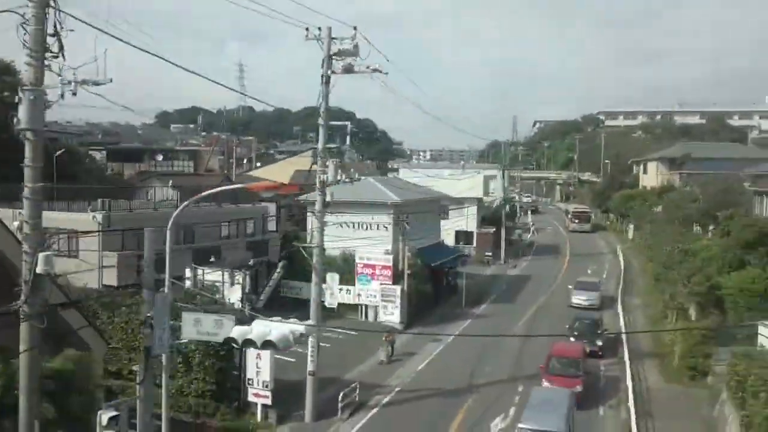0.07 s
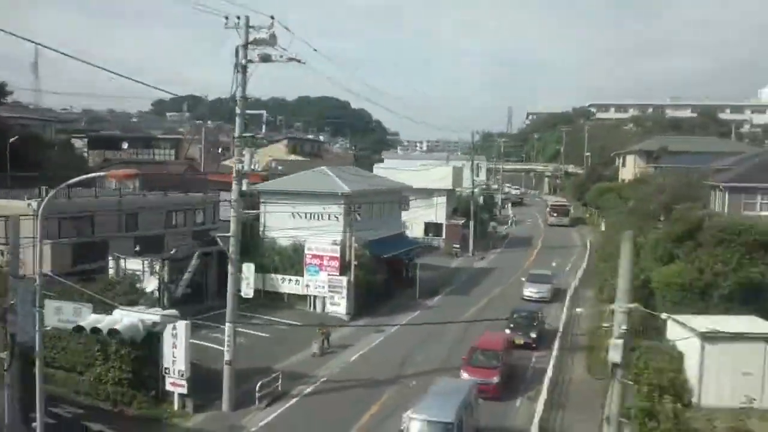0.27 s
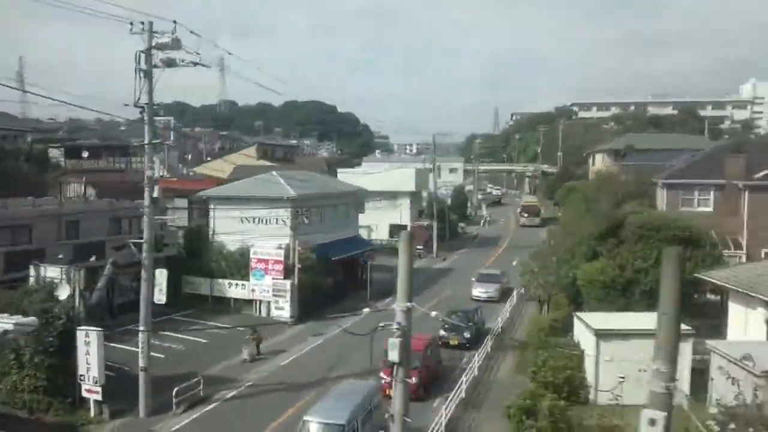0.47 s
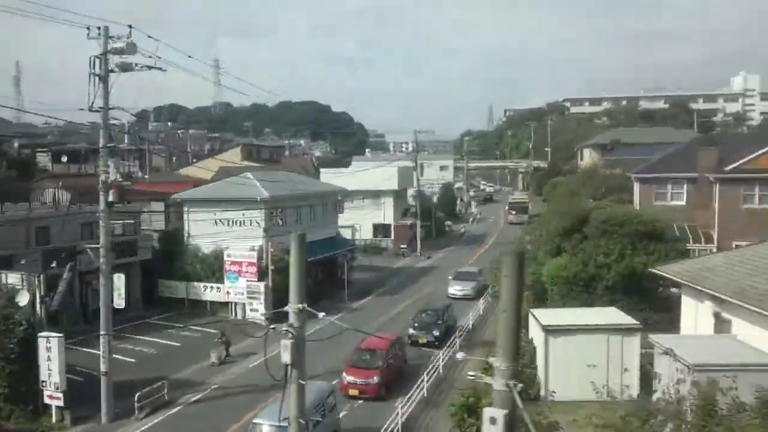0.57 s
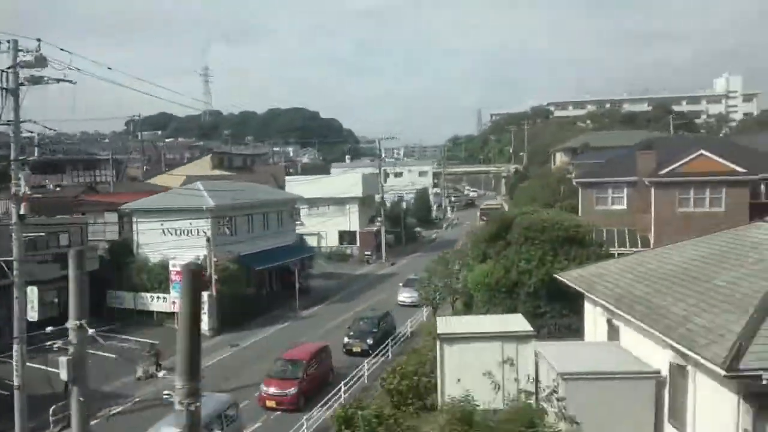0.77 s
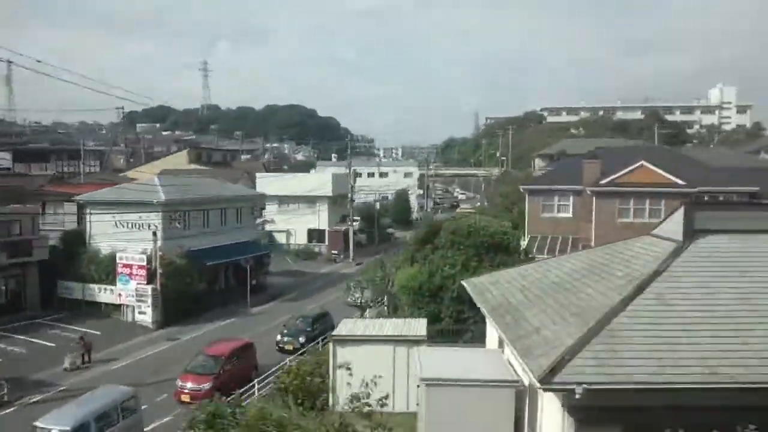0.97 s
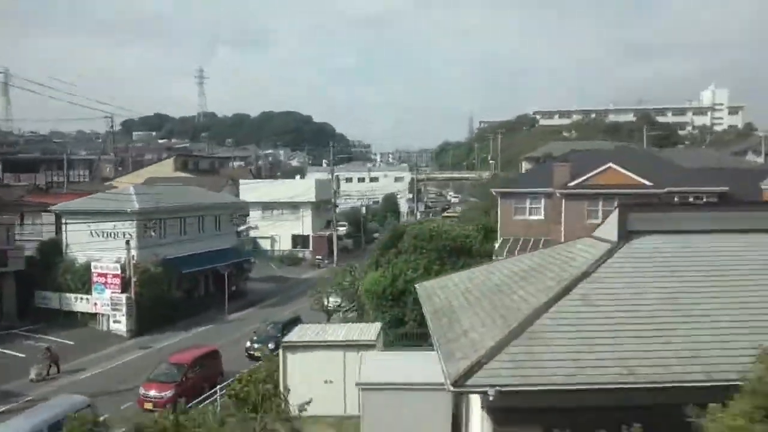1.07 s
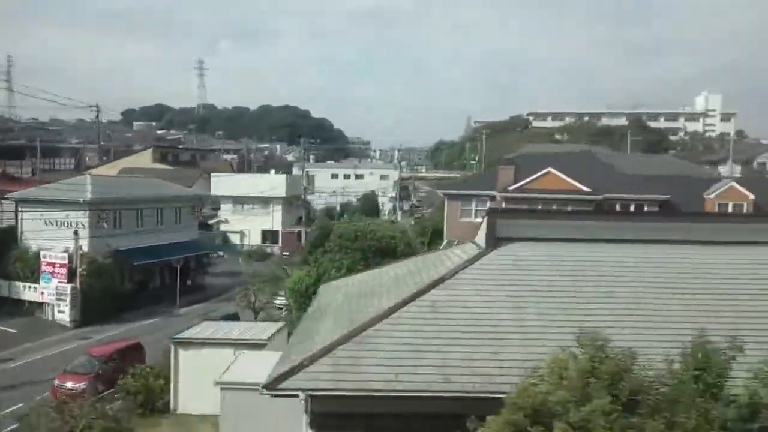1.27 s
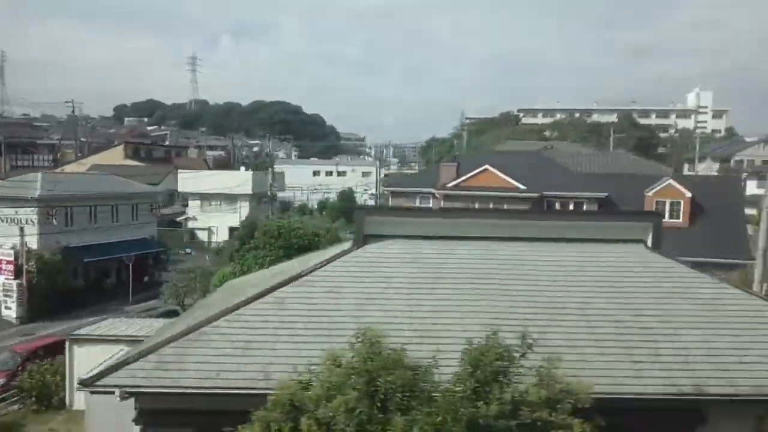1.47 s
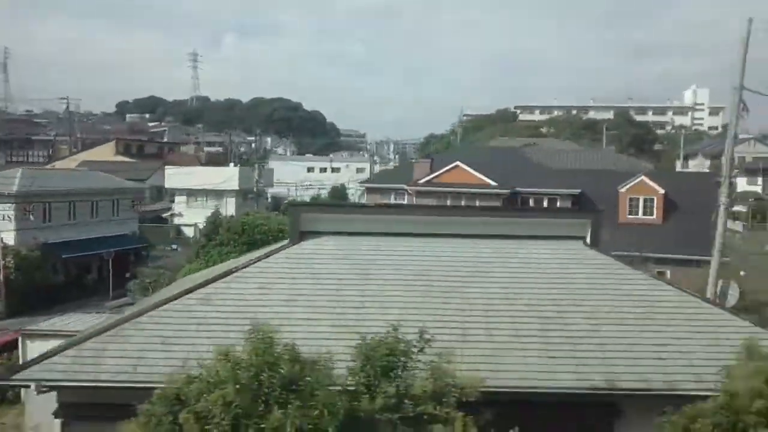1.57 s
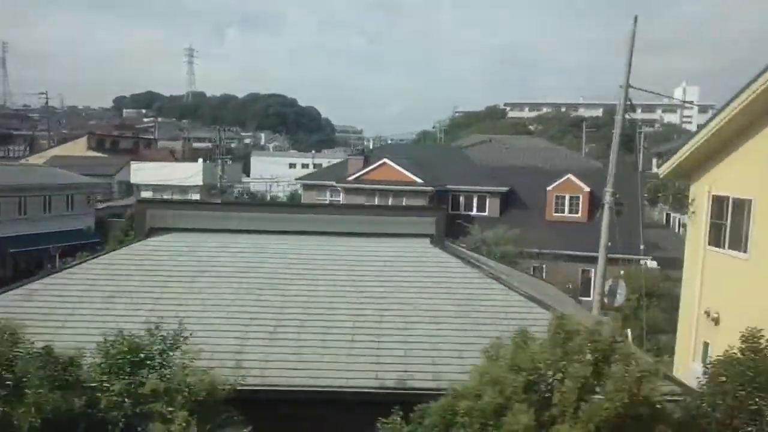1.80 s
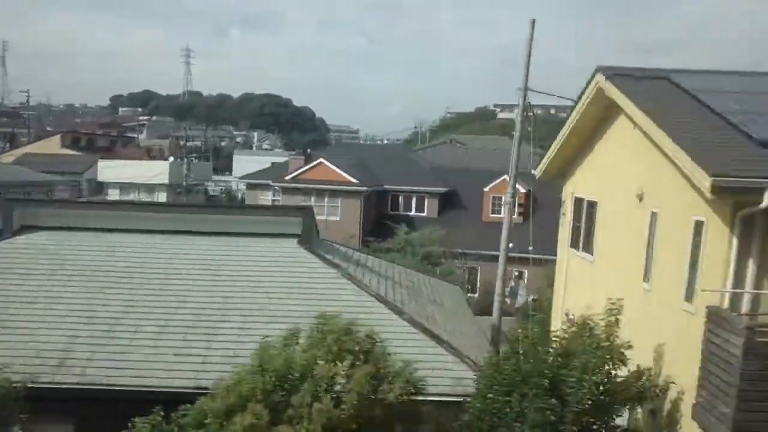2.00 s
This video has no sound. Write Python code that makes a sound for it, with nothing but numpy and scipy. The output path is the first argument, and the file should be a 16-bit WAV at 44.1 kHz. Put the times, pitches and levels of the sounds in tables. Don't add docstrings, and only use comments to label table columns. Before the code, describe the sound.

A loose fitting knocks irregularly right beside the microphone over the low rumble of a train cabin

```python
import sys
import numpy as np
from scipy import signal
from scipy.fft import rfft, irfft, next_fast_len
from scipy.io import wavfile
from scipy.ndimage import uniform_filter1d, map_coordinates

SR = 44100
rng = np.random.default_rng(int(sys.argv[2]) if len(sys.argv) > 2 else 0)


def digitize_waveform(pressure):
    field = np.atleast_2d(pressure).T
    bounded = np.clip(field, -1, 1)
    quanta = np.round(bounded * 32767).astype(np.int16)
    wavfile.write(sys.argv[1], SR, quanta)


def nominal_scale(level):
    x = np.asarray(level, float) / 20
    return 10 ** x


N = 89919

# start_s, thud_peak_db, crack_over_thud_db, thud_pitch_hz
KNOCKS = [(0.043, -8, -11.5, 580), (0.164, -14.5, -14, 608), (0.216, -19, -28, 510),
          (0.2945, -19.5, -25, 594), (0.53, -19, -29.5, 670), (.558, -21, -32, 700),
          (0.7997, -8.5, -19.5, 585), (0.8031, -18.5, 0, 509), (0.8057, -11.5, -14.5, 436),
          (0.955, -6, -16.5, 555), (.9615, -15.5, -10, 450), (1.166, -17.5, -19, 563),
          (1.191, -7.5, -26, 564), (1.223, -12, -23, 510), (1.2972, -4.5, -10.5, 544),
          (1.401, -12.5, -31, 525), (1.431, -21, -27, 606), (1.546, -31, -36, 560),
          (1.586, -15.5, -19, 480), (1.593, -7.5, -11.5, 546), (1.5975, -13, -19, 540),
          (1.9099, -7.5, -11.5, 574), (1.917, -14, -14, 470), (2.009, -13, -16, 630)]
# ratio_to_pitch, level_db, t60_s
CASE_MODES = [(1.014, 0.5, 0.016), (1, -20, 0.075), (1.6, -18, 0.0083), (0.83, -9, 0.012)]
# pitch_hz, level_db, t60_s
CRACK_MODES = [(2440, -15, 0.0058), (3720, -4.5, 0.004), (4260, -8.5, 0.013), (1450, -12, 0.0044),
               (3070, -8, 0.0017)]
# freq_hz, density_db_per_hz
CONTACT_COLOUR = [(900, -25.5), (1900, 8), (4500, -9), (5800, -11.5), (8000, -22.5), (16000, -70.5)]
# start_s, level_db
TICKS = [
    (.2175, -21),
    (1.298, -32.5),
]
# freq_hz, density_db_per_hz
TICK_COLOUR = [(2000, -52), (3300, -13.5), (4700, 11), (6500, -5.5), (8500, -11.5), (10500, -30.5),
               (16000, -32.5), (18000, -70)]
# pitch_hz, width_hz, level_db
PANEL_NOTES = [(106.6, 25.6, -4), (175, 15.2, -0.5), (232.8, 26, -4), (346, 28.5, -9.5), (420.2, 16.6, -11)]
# time_s, level_db
SHAKE = [(0, -21.5), (.1, -28), (.2, -26.5), (.3, -22), (.42, -25), (.55, -35), (.72, -32.5), (.9, -30),
         (1, -21.5), (1.12, -22.5), (1.22, -25.5), (1.38, -20.5), (1.5, -23.5), (1.63, -17), (1.72, -28),
         (1.85, -33.5), (2.04, -21.5)]
# start_s, peak_db, pitch_hz, t60_s
THUMPS = [(0.031, -11.5, 129.2, 0.27), (.169, -16.5, 230, 0.19), (0.213, -6.5, 228.5, 0.27),
          (0.236, -23.5, 223, 0.14), (0.333, -3.5, 211.2, 0.28), (.44, -11, 228, 0.18),
          (1.021, -1, 218, 0.049), (1.151, -11.5, 148, 0.11), (1.62, -15.5, 334.4, 0.29),
          (0.5442, -1.5, 332.5, 0.059), (.585, -4, 315, 0.031), (0, -10, 32, .2), (.213, -9, 151, .08),
          (1.105, -6, 136, 0.11), (1.089, -14, 280, 0.077), (1.914, -9, 65, .15), (0.965, -10.5, 255.6, .2),
          (1.04, -15, 277, 0.063), (0.359, -14, 304, 0.13), (1.307, -10, 256.4, 0.22),
          (0.8, -5, 189, 0.053), (0.858, 2, 169, 0.042), (0.961, -2, 175, 0.12), (1.111, -4, 226.4, 0.12),
          (1.256, -8.5, 196, .1), (1.298, -1, 177.5, 0.21), (1.406, -8.5, 209, 0.23),
          (1.458, -4.5, 216.7, 0.21), (1.584, -7, 167.2, 0.48), (1.913, -0.5, 206.2, 0.13),
          (1.96, -6.5, 217, 0.097), (2.014, -30, 184, 0.074)]
# time_s, level_db
SWAY = [(0, -16.5), (.12, -26), (.2, -24.5), (.3, -17), (.4, -21.5), (.5, -14.5), (.6, -17.5), (.72, -21),
        (.9, -21.5), (1.03, -15), (1.16, -15), (1.26, -15), (1.31, -23.5), (1.45, -19.5), (1.65, -20),
        (1.8, -19), (1.92, -24), (2.04, -18.5)]
# freq_hz, density_db_per_hz
RUMBLE_COLOUR = [(11, -40.5), (22, 7.5), (50, 0), (92, -2), (130, -10), (210, -53), (350, -120)]
# time_s, level_db
TYRE_LOAD = [(0, 1.5), (.1, -3), (.28, -0.5), (.42, 0.5), (.52, -1), (.58, 3.5), (.7, 1), (.83, 2.5),
             (.92, 3.5), (1, 7), (1.08, 1), (1.16, 4.5), (1.24, 8), (1.35, 7.5), (1.47, -1), (1.62, 4),
             (1.76, -5), (2.04, 4.5)]
# freq_hz, density_db_per_hz
ROAR_COLOUR = [(90, -24.5), (200, -3), (400, -8), (700, -10.5), (1100, -18), (1700, -27.5), (3000, -39.5),
               (9000, -120)]
# time_s, level_db
DRAUGHT = [(0, -41), (.1, -49), (.25, -44), (.38, -38.5), (.55, -46.5), (.7, -43.5), (.83, -39), (.95, -44),
           (1.05, -42), (1.15, -40), (1.3, -43), (1.5, -46), (1.7, -45), (1.82, -40.5), (1.87, -37.5),
           (2.04, -45.5)]
# freq_hz, density_db_per_hz
AIR_COLOUR = [(800, -10), (2200, -2), (3100, -7), (4700, 0.5), (5600, -7.5), (6500, -15), (8000, -20.5),
              (16000, -63.5)]
# start_s, level_db
RATTLES = [(0.2524, -31), (0.3413, -28.5), (0.3722, -27.5), (.39, -49), (0.5207, -37.5), (1.0231, -44),
           (1.041, -36), (1.051, -28), (1.359, -43), (1.3985, -44), (1.4284, -33), (1.4664, -32),
           (1.5424, -41), (1.5686, -31.5), (1.579, -29), (1.6412, -33), (1.706, -38), (1.7414, -49.5),
           (1.8528, -30), (1.971, -55)]
# freq_hz, density_db_per_hz
RATTLE_COLOUR = [(900, -48), (2000, -19.5), (3500, 1), (5000, -5), (6500, -12), (9000, -46.5), (16000, -80)]
# start_s, depth_db
DUCKS = [
    (0.049, 3.5),
    (0.221, 5.5),
    (0.345, 10.5),
    (0.528, 0.5),
    (0.959, 6.5),
    (1.188, 3.5),
    (1.3037, 12.5),
    (1.602, 5.5),
    (1.919, 11),
]
# freq_hz, level_db_per_bin
FAINTEST = [(1500, -90), (2900, -83), (4500, -93), (5600, -84.5), (7000, -83.5), (9000, -75), (16000, -91)]
# time_s, rise_db
STRAIN = [(0, 7), (.1, -0.5), (.235, 7), (.27, -6.5), (.36, 2.5), (.45, -6), (.55, -1), (.8, 4),
          (.93, -3.5), (1.02, 7), (1.1, -2), (1.22, 3), (1.34, -2), (1.47, 1), (1.56, -5.5), (1.63, 2),
          (1.9, 1), (1.95, 3)]
SHARP_BLOWS = [
    .219,
    1.299,
]

SOFT_START_S = 0.0006


def unit(x):
    return x / np.sqrt(np.mean(x ** 2) + 1e-20)


def along(points, hz):
    f, v = np.transpose(points)
    return np.interp(np.log(hz + 1), np.log(f + 1), v)


def curve(rows):
    s, v = np.transpose(rows)
    return np.interp(np.arange(N) / SR, s, v)


def wobble(rate):
    return map_coordinates(rng.standard_normal(400), [np.arange(N) * rate / SR])


def filtered(x, response):
    m = next_fast_len(N + SR // 2)
    return irfft(rfft(x, m) * response(np.fft.rfftfreq(m, 1 / SR)), m)[:N]


def patchy(spectrum, patchy_db):
    z = signal.stft(rng.standard_normal(N + 512), nperseg=512)[2]
    field = uniform_filter1d(rng.standard_normal(z.shape), size=8, axis=0)
    field = uniform_filter1d(field, size=10, axis=1)
    noise = signal.istft(z * nominal_scale(patchy_db * unit(field)), nperseg=512)[1][:N]
    return unit(filtered(noise, lambda hz: nominal_scale(along(spectrum, hz))))


def ring(hz, t60, rise_s, t):
    return -np.sin(2 * np.pi * hz * t) * nominal_scale(-60 * t / t60) * (1 - np.exp(-t / rise_s))


def puff(level_db, t60, t):
    return nominal_scale(level_db - 60 * t / t60) * (1 - np.exp(-t / SOFT_START_S))


def add(track, s, sound):
    part = track[round(s * SR):][:len(sound)]
    part += sound[:len(part)]


def knock(pitch, crack_db, t):
    crack_lag_s, detune, scatter_db = 0.0003, 0.04, 0.54
    modes = [(pitch * ratio, level, t60, 0) for ratio, level, t60 in CASE_MODES]
    modes += [(hz, level + crack_db, t60, crack_lag_s) for hz, level, t60 in CRACK_MODES]
    sound = np.zeros(len(t))
    for hz, level, t60, lag_s in modes:
        a, b = rng.standard_normal(2)
        note = ring(hz * (1 + detune * b), t60, SOFT_START_S, np.maximum(t - lag_s, 0))
        sound += nominal_scale(level + scatter_db * a) * note
    return sound


def fitting():
    thuds, clicks, snaps, ticks = np.zeros((4, N))
    t = np.arange(SR // 10) / SR
    for s, db, crack_db, pitch in KNOCKS:
        add(thuds, s, nominal_scale(db + 4) * knock(pitch, crack_db, t))
        clicks[round((s + 0.0012) * SR)] = -nominal_scale(db + crack_db + 12.5)
        add(snaps, s, puff(db + crack_db, 0.011, t))
    for s, db in TICKS:
        add(ticks, s, nominal_scale(db - 60 * t / 0.0072))
    near = thuds + filtered(clicks, lambda hz: nominal_scale(along(CONTACT_COLOUR, hz)))
    near += snaps * patchy(CONTACT_COLOUR, patchy_db=1)
    near += ticks * patchy(TICK_COLOUR, patchy_db=1)
    return near + cabin(near)


def cabin(near):
    level_db, t60_s, cutoff_hz = -11, 0.09, 900
    t = np.arange(SR // 4) / SR
    tail = rng.standard_normal(len(t)) * nominal_scale(-60 * t / t60_s)
    wet = signal.fftconvolve(near, tail / np.linalg.norm(tail))[:N]
    return nominal_scale(level_db) * filtered(wet, lambda f: 1 / (1 + 1j * f / cutoff_hz))


def thumps():
    out, t = np.zeros(N), np.arange(SR // 2) / SR
    for s, db, hz, t60 in THUMPS:
        add(out, s, nominal_scale(db + 2) * ring(hz, t60, 0.0041, t))
    return out


def panel_response(f):
    total = 0
    for k, (centre, width, db) in enumerate(PANEL_NOTES):
        damping = 1j * f * width
        total = total + (-1) ** k * nominal_scale(db) * damping / (centre * centre - f * f + damping)
    return total / (1 + (f / 600) ** 4)


def panels():
    shake = rng.standard_normal(N) * nominal_scale(1.5 * wobble(25))
    return unit(filtered(shake, panel_response)) * nominal_scale(curve(SHAKE) + 7.5)


def body():
    noise = filtered(rng.standard_normal(N), lambda hz: nominal_scale(along(RUMBLE_COLOUR, hz)))
    return unit(noise * nominal_scale(1.2 * wobble(12))) * nominal_scale(curve(SWAY) + 2)


def tyres():
    return patchy(ROAR_COLOUR, patchy_db=1) * nominal_scale(-31.5 + curve(TYRE_LOAD) + 2 * wobble(30.15))


def rattles():
    out, t = np.zeros(N), np.arange(SR // 20) / SR
    for s, db in RATTLES:
        add(out, s, puff(db, 0.011, t))
    return 2 * out * patchy(RATTLE_COLOUR, patchy_db=4.5)


def air():
    return patchy(AIR_COLOUR, patchy_db=1) * nominal_scale(curve(DRAUGHT) + 1.1 * wobble(30))


def scene():
    return (fitting() + thumps() + panels() + body() + tyres() + rattles() + air())[None]


def ducking_db():
    attack_s, recover_s = 0.0012, 0.21
    t, loss = np.arange(N) / SR, np.zeros(N)
    for s, db in DUCKS:
        attack = np.clip((t - s) / attack_s, 0, 1)
        loss += db * attack * np.exp(-np.maximum(t - s, 0) / recover_s)
    return loss


def limited(x):
    top, hard = 0.69, 12
    return x / (1 + np.abs(x / top) ** hard) ** (1 / hard)


def starved(x, size, shift_db):
    lead, width = 981, size // 128
    frame = dict(window="cosine", nperseg=size, noverlap=size // 2)
    z = signal.stft(np.pad(x, (lead, 2048), "reflect"), **frame)[2]
    bands = np.arange(len(z)) // width
    centres = np.clip(np.arange(z.shape[1]) * size // 2 - lead, 0, N - 1)
    strain_db = curve(STRAIN)[centres]
    power = np.add.reduceat(abs(z) ** 2, np.arange(0, len(z), width)) / width
    faintest_db = along(FAINTEST, (bands + 0.5) * width * SR / size)[:, None]
    kept = power[bands] > nominal_scale(2 * (shift_db + strain_db + faintest_db))
    return signal.istft(z * kept, **frame)[1][lead:][:N]


def thinned(x):
    distance_s = np.min(abs(np.arange(N)[:, None] / SR - np.array(SHARP_BLOWS)), axis=1)
    short = np.clip(4 - distance_s / 0.004, 0, 1)
    return short * starved(x, size=256, shift_db=7.5) + (1 - short) * starved(x, size=2048, shift_db=1)


def roll_off(x):
    return signal.sosfilt(signal.butter(12, 15800, fs=SR, output="sos"), x)


def record(dry):
    ducked = dry[0] * nominal_scale(-ducking_db())
    mix = thinned(limited(ducked))[None]
    return roll_off(mix)


dry = scene()
out = record(dry)
digitize_waveform(out)
```